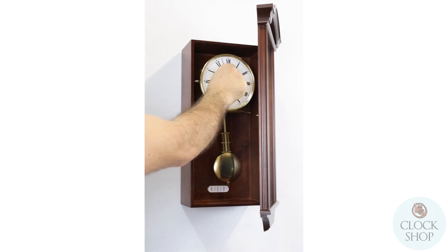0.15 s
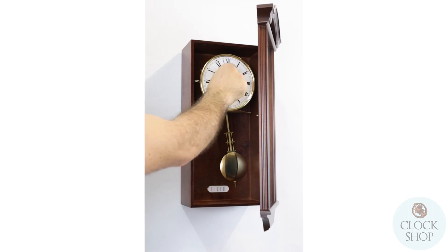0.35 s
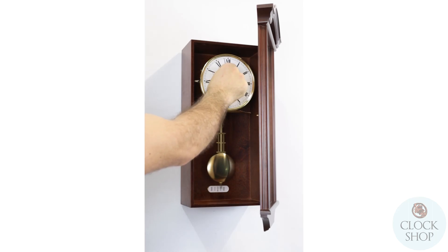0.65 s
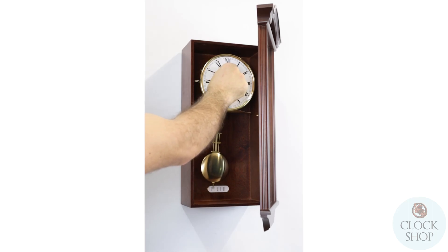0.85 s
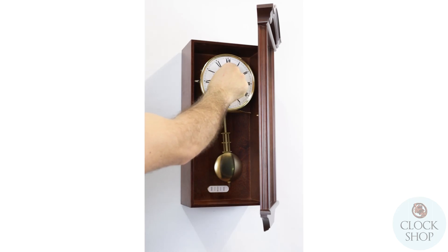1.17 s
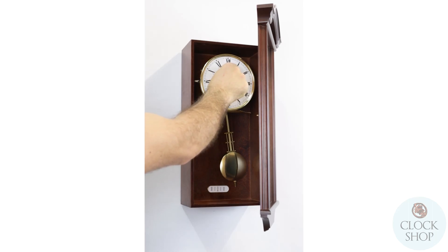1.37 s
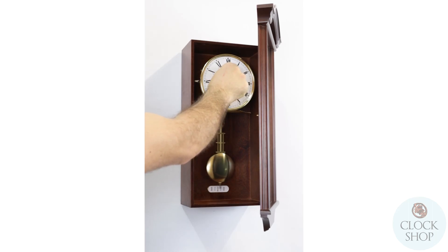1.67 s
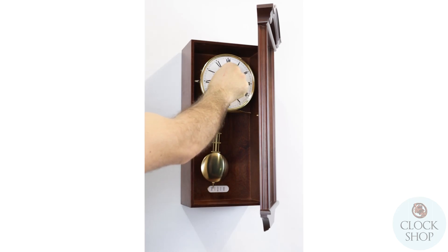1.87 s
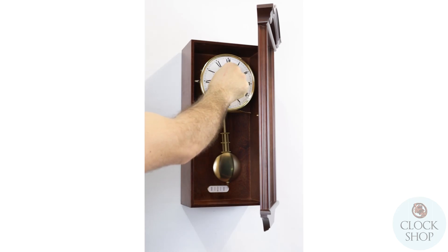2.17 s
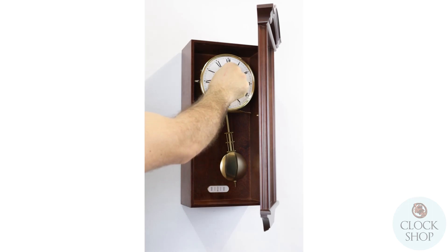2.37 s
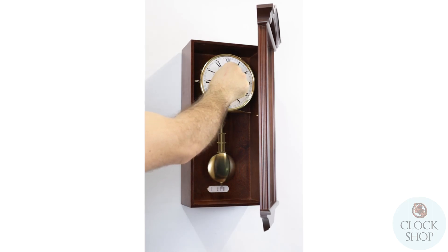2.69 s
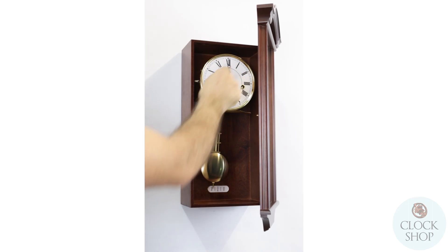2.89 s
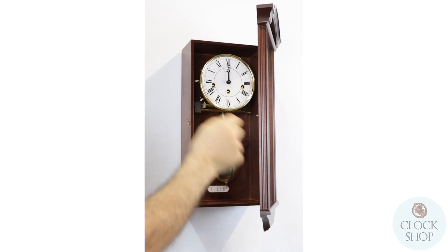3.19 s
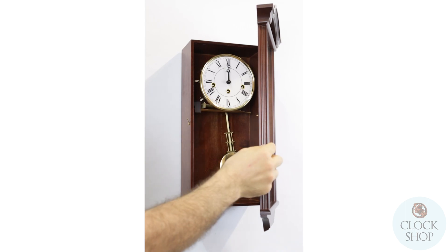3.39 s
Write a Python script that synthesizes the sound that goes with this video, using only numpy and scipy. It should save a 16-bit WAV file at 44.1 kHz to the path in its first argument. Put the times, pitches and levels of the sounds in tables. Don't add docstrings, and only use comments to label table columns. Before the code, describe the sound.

A mechanical pendulum clock ticks and tocks crisply every half second from 0.25 s, close in a quiet room with faint rumble and hiss. Soft finger rubs and dull knocks come around 0.5 and 1.2-1.65 s. At 2.49 s a lever clacks hard, falling again with a ringing rattle at 2.54 s. From 2.63 s gear teeth chatter, speeding into a hissy metallic whir until the end at about 3.55 s, with thinner ticks beneath.

```python
import sys
import numpy as np
from scipy import signal
from scipy.io import wavfile
from scipy.ndimage import uniform_filter1d

SR = 44100
rng = np.random.default_rng(int(sys.argv[2]) if len(sys.argv) > 2 else 0)


def linear_from_db(decibels):
    return 10 ** (np.asarray(decibels, float) / 20)


def wav_out(sig):
    wavfile.write(sys.argv[1], SR, np.round(np.clip(np.atleast_2d(sig).T, -1, 1) * 32767).astype(np.int16))


N = 156114


def evened(x):
    return x / np.sqrt(np.mean(x ** 2) + 1e-20)


def read(points, hz):
    f, value = np.transpose(points)
    return np.interp(np.log(hz + 1), np.log(f + 1), value)


def add(mix, s, sound):
    part = mix[round(s * SR):][:len(sound)]
    part += sound[:len(part)]


def resonate(x, hz, width):
    turn = np.exp(2j * np.pi * hz * np.arange(len(x)) / SR)
    r = np.exp(-np.pi * width / SR)
    return 2 * (turn * signal.lfilter([1 - r], [1, -r], x / turn)).real


def bank(x, peaks):
    y = np.zeros(len(x))
    for k, (hz, width, db) in enumerate(peaks):
        steep = resonate(resonate(x, hz, width), hz, 3 * width)
        y += (-1) ** k * linear_from_db(db) * steep / np.sqrt(width)
    return y / np.sqrt(abs(uniform_filter1d(y ** 2, 8000)) + 1e-12)


def coloured(size, spectrum, t60=None):
    hop = 512 if t60 is None else 64
    frames, hz = size // hop + 5, np.fft.rfftfreq(4 * hop, 1 / SR)
    a, b = rng.standard_normal((frames, len(hz), 2)).T
    fall_db = 0
    if t60 is not None:
        fall_db = -60 * np.arange(frames) * hop / SR / read(t60, hz)[:, None]
    z = (a + 1j * b) * linear_from_db(read(spectrum, hz)[:, None] + fall_db)
    return signal.istft(z, nperseg=4 * hop, noverlap=3 * hop)[1][:size]


def ring(modes, spread=0.00055, rough=.5):
    size, vary_db, longest_t60 = 12000, 1.5, .45
    t = np.arange(size) / SR
    hz, db, t60 = np.transpose(modes)[:, :, None]
    detune, phase, vary = rng.uniform(-1.02, 1, (len(modes), 3)).T[:, :, None]
    flutter = rng.standard_normal((len(modes), size, 2))
    for _ in range(2):
        flutter = uniform_filter1d(flutter, 250, axis=1)
    flutter = flutter @ [1, 1j]
    wave = np.exp(2j * np.pi * hz * (1 + spread * detune) * t + 1j * np.pi * phase)
    wave = wave * (1 + rough * flutter / abs(flutter).mean())
    decay = linear_from_db(db + vary_db * vary - 60 * t / np.clip(t60, .01, longest_t60))
    return (decay * wave.imag).sum(0)


def tilted(modes, low_db, high_db):
    return [(hz, db + low_db * (hz < 1350) + high_db * (hz > 3000), t60) for hz, db, t60 in modes]


def blow(modes, wash, wash_db, crack_db, rise_s=0.00066, rough=0.25):
    # (frequency [Hz], t60 [s])
    case_t60 = [(500, 0.39), (2000, 0.11), (5000, 0.22), (12000, 0.095)]
    tones = ring(modes, rough=rough)
    t = np.arange(len(tones)) / SR
    dense = coloured(len(t), wash, case_t60)
    crack = resonate(resonate(rng.standard_normal(len(t)), 4200, 8000), 5200, 9200)
    crack = crack * np.exp(-t / .0015)
    x = tones / tones[:270].std() + linear_from_db(wash_db) * dense / dense[:270].std() + linear_from_db(crack_db) * crack
    return np.minimum(t / rise_s, 1) * x / x[:270].std()


def room_tone():
    # (frequency [Hz], density [dB per Hz])
    air_spectrum = [(25, -39), (55, -16.5), (80, -6.5), (200, -12), (400, -21.5), (1200, -32), (5000, -42),
                    (15500, -48.5)]
    # (time [s], level [dB])
    rumble_levels = [(0, -48), (.2, -63), (.3, -57.5), (.6, -55.5), (.8, -57), (.89, -48.5), (.96, -58),
                     (1.05, -47), (1.17, -61), (1.3, -50.5), (1.6, -43.5), (1.78, -57.5), (1.88, -52.5),
                     (2.0, -62.5), (2.2, -58), (3.1, -63), (3.3, -38), (3.45, -58.5)]
    rumble_hz, rumble_width, air_db = 46.68, 4.5, -59.5
    t = np.arange(N) / SR
    waver = rng.standard_normal(N)
    for _ in range(2):
        waver = resonate(waver, rumble_hz, rumble_width)
    waver = waver / np.sqrt(abs(uniform_filter1d(waver ** 2, 5000)) + 1e-12)
    air = linear_from_db(air_db) * evened(coloured(N, air_spectrum))
    return air + waver * linear_from_db(np.interp(t, *np.transpose(rumble_levels)))


def hand():
    # (time [s], level [dB], rub length [s], low modes [dB], blur [dB])
    nudges = [
        (0.543, -52.5, 0.025, 2.5, -11.5),
        (1.207, -63.5, 0.11, -22, 17),
        (1.263, -53, 0.0067, -25, 9),
        (1.288, -62.5, 0.034, -2, 10),
        (1.487, -73, 0.015, -16, 10),
        (1.616, -61.5, 0.044, -8, -3.5),
        (2.464, -56, 0.014, -24, 18),
    ]
    # (frequency [Hz], level [dB], t60 [s])
    dial_modes = [(400, -6, .15), (610, 0, .12), (1150, -4, .1), (1400, -10, .1), (2930, -7, .12),
                  (3150, -13, .05)]
    # (frequency [Hz], density [dB per Hz])
    dial_wash = [(300, -3), (700, 4), (1500, 4), (3200, -4), (4100, -6), (4800, -26)]
    # (time [s], level [dB], frequency [Hz], t60 [s])
    knocks = [
        (0.0, -53, 95, 0.54),
        (0.13, -49, 96.8, .3),
        (1.273, -58, 4600, 0.29),
        (1.285, -53, 782, 0.57),
        (1.635, -45, 401, 0.13),
        (2.335, -57.5, 788, 0.63),
        (2.718, -49.5, 770, 0.15),
    ]
    mix = np.zeros(N)
    i = np.arange(4000)
    for s, db, length, low_db, blur_db in nudges:
        modes = [(hz, d + low_db * (hz < 1000), t60) for hz, d, t60 in dial_modes]
        rub = rng.standard_normal(4000) ** 3 * (i < length * SR)
        rub = rub * np.minimum(i / (0.0033 * SR), 1)
        shake = signal.fftconvolve(rub, blow(modes, dial_wash, blur_db, crack_db=-42))
        add(mix, s, linear_from_db(db) * shake / shake[:2000].std())
    for s, db, hz, t60 in knocks:
        tone = ring([(hz, 0, t60)], rough=.2)
        add(mix, s, linear_from_db(db) * tone * np.minimum(np.arange(len(tone)) / SR / 0.0087, 1))
    return mix


def scrapes():
    # (time [s], level [dB], length [s], frequency [Hz])
    scrape_events = [
        (1.266, -60.5, .0025, 4000),
        (1.3, -73.5, .006, 2800),
        (4, -65, 0.0089, 10700),
        (4, -66, 0.016, 7500),
    ]
    mix = np.zeros(N)
    t = np.arange(2000) / SR
    for s, db, length, hz in scrape_events:
        grit = rng.standard_normal(2000) ** 3 * np.exp(-(t / length - 1) ** 2 * 3)
        add(mix, s - length, linear_from_db(db) * evened(resonate(resonate(grit, hz, 2500), hz, 3500)))
    return mix


def lever():
    # (time [s], level [dB])
    drops = [
        (2.489, -32),
        (2.4895, -25.5),
        (2.4944, -40),
    ]
    # (lands [s], caught [s])
    landing_s, caught_s = (2.538, 2.582)
    # (time [s], level [dB], crack [dB])
    rattles = [
        (2.538, -33, 5),
        (2.543, -40, 7),
        (2.5552, -36.5, 9),
        (2.558, -48, -6),
        (2.5653, -43.5, 4),
        (2.575, -53, -10),
        (2.58, -53, -8),
    ]
    # (frequency [Hz], level [dB], t60 [s])
    drop_modes = [(415, -17, .1), (862, -8, 0.073), (1064, 1.5, 0.05), (1294, -2, .09), (1660, -10.5, 0.11),
                  (2480, -6, 0.049), (2770, -7, 0.042), (3150, -3.5, 0.034), (3430, -6, 0.048),
                  (3850, -16, 0.075), (4320, -8, 0.057), (5330, -11.5, 0.11), (7180, -5, 0.03),
                  (9390, -29, .05)]
    # (frequency [Hz], level [dB], t60 [s])
    bounce_modes = [(400, -4.5, 0.18), (568, -10.5, 0.26), (876, -11, 0.18), (953, -9.5, 0.21),
                    (1065, 2, 0.18), (1310, -26, .15), (1470, -15, 0.17), (1904, -11.5, 0.21),
                    (2250, -13, 0.18), (3150, -1.5, 0.19), (3280, -6, 0.15), (3500, -7, .12),
                    (4080, -9.5, 0.17), (8700, -17, 0.16)]
    # (frequency [Hz], level [dB], t60 [s])
    rattle_modes = [(1900, -4, .05), (3150, 0, .06), (4200, -6, .04), (6200, -8, .04), (6590, -8, .08),
                    (8236, -3, .035), (8760, -8, .07), (10610, -5, .025), (11770, -5, .025),
                    (13800, -10, .02)]
    # (frequency [Hz], density [dB per Hz])
    drop_wash = [(200, -21), (700, -10), (1200, 2), (2800, -5.5), (5500, -13), (6200, -15), (10000, -27),
                 (13000, -12), (15500, -34)]
    # (frequency [Hz], density [dB per Hz])
    bounce_wash = [(200, -18), (400, -37), (1070, -3), (3200, -9.5), (5200, -15), (6500, -18.5),
                   (11000, -19.5), (15500, -29)]
    mix, rung = np.zeros((2, N))
    for s, db in drops:
        sound = blow(drop_modes, drop_wash, wash_db=-8.0, crack_db=1.5, rise_s=0.00028, rough=.1)
        add(mix, s, linear_from_db(db) * sound)
    sound = blow(bounce_modes, bounce_wash, wash_db=-7.0, crack_db=-9.0, rise_s=0.0024, rough=.1)
    add(rung, landing_s, linear_from_db(-29) * sound)
    for s, db, crack_db in rattles:
        sound = blow(rattle_modes, bounce_wash, wash_db=-6.0, crack_db=crack_db, rise_s=0.0005, rough=0.52)
        add(mix, s, linear_from_db(db) * sound)
    since_caught = np.clip(np.arange(N) / SR - caught_s, 0, .06)
    return mix + rung * linear_from_db(-200 * since_caught)


def train():
    # (time [s], level [dB], bearing hiss [dB])
    effort = [
        (2.63, -65, -18),
        (2.7, -63.5, -28),
        (2.8, -56, -28),
        (2.95, -53.5, -21),
        (3.11, -50.5, -14.5),
        (3.25, -50, -15.5),
        (3.38, -49, -20),
        (3.5, -50, -9),
        (3.54, -52, -12.5),
    ]
    # (frequency [Hz], width [Hz], level [dB])
    frame_peaks = [(2547, 360, 3), (3027, 64, -3), (3363, 340, 0.5), (4340, 670, -9)]
    # (frequency [Hz], width [Hz], level [dB])
    case_peaks = [(880, 66, -8.5), (1043, 55, 2), (1200, 370, -1.5), (1890, 140, -3)]
    # (frequency [Hz], width [Hz], level [dB])
    bearing_peaks = [(6250, 250, -5), (7300, 400, 0), (8300, 500, -8), (9600, 500, -3), (11400, 300, -8),
                     (15100, 300, -7)]
    # (frequency [Hz], width [Hz], level [dB])
    fan_peaks = [(12850, 220, 0)]
    release_s, top_teeth_per_s, spin_up_s, first_tooth = 2.5, 360, .96, .52
    teeth_per_turn, teeth_per_flap, jitter, tooth_s = 13, 3.5, 0.019, .0032
    t = np.arange(N) / SR
    u = np.maximum(t - release_s, 0)
    teeth = first_tooth + top_teeth_per_s * (u - spin_up_s * (1 - np.exp(-u / spin_up_s)))
    s, level_db, hiss_db = np.transpose(effort)
    chatter_db = np.minimum(-6 + 40 * (t - s[0]), 10)

    slip, size = rng.standard_normal((400, 2)).T
    tooth = teeth.astype(int)
    since = (teeth % 1 - jitter * abs(slip[tooth])) / np.maximum(np.gradient(teeth) * SR, 1)
    puff = (since > 0) * np.exp(-abs(since) / tooth_s) * linear_from_db(2.0 * size[tooth])
    puff = puff / np.sqrt(np.mean(puff[t > 2.8] ** 2))

    click_noise, loose_noise, hiss_noise, hum_noise = rng.standard_normal((N, 4)).T
    loose = loose_noise * linear_from_db(0.6 * np.minimum(rng.exponential(1, N), 4))
    loose = loose * (rng.random(N) < 5000 / SR)
    wobble = linear_from_db(0.5 * np.cos(2 * np.pi * teeth / teeth_per_turn))
    clicks = linear_from_db(10) * resonate(click_noise * puff, 3350, 600)
    body = bank((clicks + linear_from_db(chatter_db) * evened(loose)) * wobble, frame_peaks)
    hum = linear_from_db(-6) * bank(hum_noise * wobble * (1 + 0.12 * puff), case_peaks)

    flap = np.cos(2 * np.pi * teeth / teeth_per_flap)
    grit = hiss_noise * (0.48 + 1.1 * puff) * linear_from_db(-2.5 * flap)
    hiss = bank(grit, bearing_peaks) + linear_from_db(-2) * bank(grit, [(10800, 7800, 0)])
    hiss = hiss + linear_from_db(-9 + 7 * flap) * bank(hiss_noise, fan_peaks)
    mix = body + hum + linear_from_db(np.interp(t, s, hiss_db)) * hiss
    return mix * linear_from_db(np.interp(t, s, level_db)) * np.clip((t - s[0]) / 0.0046, 0, 1)


def escapement():
    # (time [s], level [dB], low modes [dB], high modes [dB], crack [dB])
    ticks = [
        (0.2532, -30, -1, -4, -1),
        (1.269, -30, -2.5, -1.5, 3.5),
        (2.2982, -29.5, -0.5, -4.5, 5.5),
        (3.3217, -32.5, -10, -4, -16),
    ]
    # (time [s], level [dB], low modes [dB], high modes [dB])
    tocks = [
        (0.719, -27, 0.5, 2.5),
        (1.7443, -28.5, -2.5, 1.5),
        (2.7681, -31, -19, 1.5),
    ]
    # (frequency [Hz], level [dB], t60 [s])
    tick_modes = [(844, -9.5, 0.078), (931, -16.5, 0.19), (1293, -10.5, 0.077), (1543, -10.5, 0.084),
                  (1720, -13, 0.13), (1806, -4.5, 0.066), (2179, -5, 0.079), (2696, -12, 0.029),
                  (3160, -22, .15), (3270, -11, 0.073), (3620, -2, 0.068), (3660, -2, 0.035),
                  (3940, -6, 0.1), (5090, -19.5, 0.17)]
    # (frequency [Hz], level [dB], t60 [s])
    tock_modes = [(1040, -18.5, 0.25), (1280, -4.5, 0.083), (1510, -12.5, 0.097), (1828, -4, 0.082),
                  (2160, -4.5, .1), (2480, -5.5, 0.037), (3160, 3, 0.03), (3420, -6, 0.069),
                  (3570, -11, 0.14), (3910, -9.5, .16), (3953, -4, 0.15), (4037, -3, 0.088),
                  (4300, -23, 0.19), (4775, -18, 0.15)]
    # (frequency [Hz], density [dB per Hz])
    tick_wash = [(400, -15), (800, -9.5), (1700, 1), (4000, -3.5), (5000, -19), (11000, -13.5),
                 (15500, -32)]
    # (frequency [Hz], density [dB per Hz])
    tock_wash = [(500, -31), (1100, -5), (2000, -6), (4000, -0.5), (4800, -21), (11500, -12.5),
                 (15500, -40)]
    mix = np.zeros(N)
    for s, db, low_db, high_db, crack_db in ticks:
        modes = tilted(tick_modes, low_db, high_db)
        sound = blow(modes, tick_wash, wash_db=-6.0, crack_db=crack_db, rise_s=0.0015, rough=.12)
        add(mix, s - .0012, linear_from_db(db - 8.5) * sound)
    for s, db, low_db, high_db in tocks:
        modes = tilted(tock_modes, low_db, high_db)
        sound = blow(modes, tock_wash, wash_db=-8.0, crack_db=-4.5, rise_s=0.00086, rough=.12)
        add(mix, s - .0018, linear_from_db(db - 10.0) * sound)
    return mix


def scene():
    return (room_tone() + hand() + scrapes() + lever() + train() + escapement())[None]


def top_cut(x):
    return signal.sosfilt(signal.butter(12, 16110, fs=SR, output="sos"), x)


def record(dry):
    edge_hz, gate_hz, gate_percent, gate_bins = 15750, 12900, 46, 16
    low_pass = signal.firwin(1023, edge_hz, window=("kaiser", 9), fs=SR)
    dry = signal.oaconvolve(dry, low_pass[None], "same")
    hz, t, z = signal.stft(dry, SR, window="cosine", nperseg=2048)
    power = (abs(z[0, :1024]) ** 2).reshape(-1, gate_bins, len(t)).sum(1)
    keep = power > np.percentile(power, gate_percent, axis=1)[:, None]
    keep = np.repeat(keep, gate_bins, axis=0)
    keep = np.vstack([keep, keep[:1]]) | (hz < gate_hz)[:, None]
    gated = signal.istft(z * keep, SR, window="cosine", nperseg=2048)[1][:, :N]
    return top_cut(gated)


dry = scene()
out = record(dry)
wav_out(out)
```